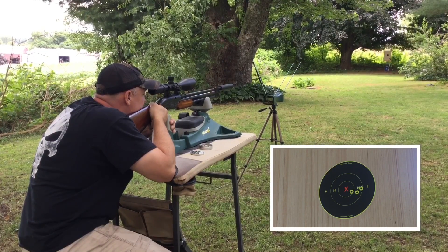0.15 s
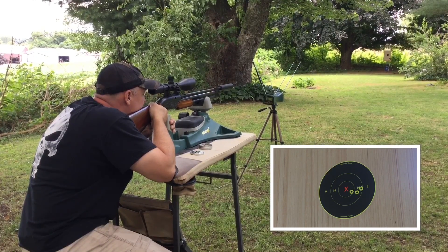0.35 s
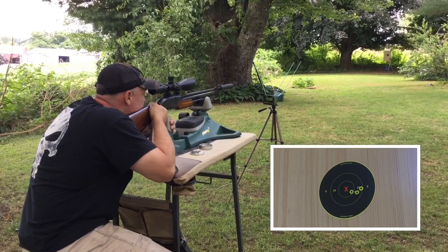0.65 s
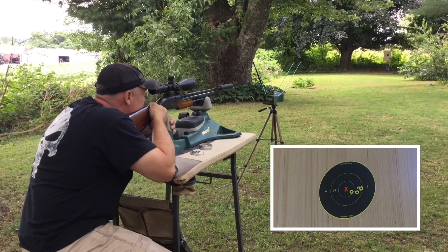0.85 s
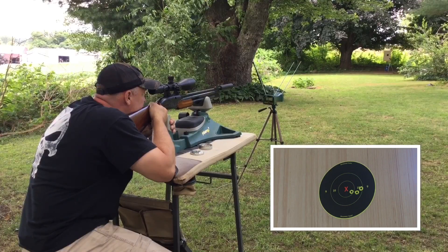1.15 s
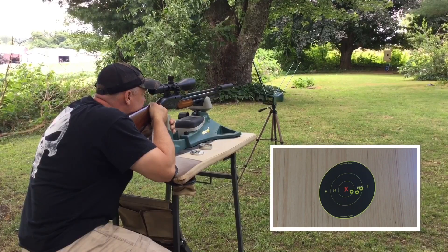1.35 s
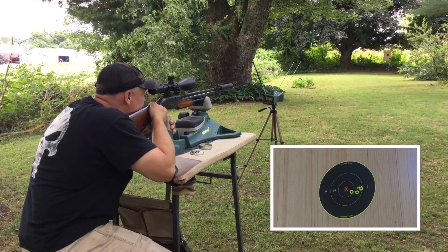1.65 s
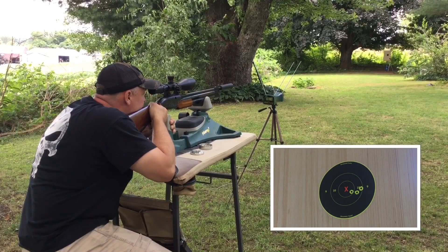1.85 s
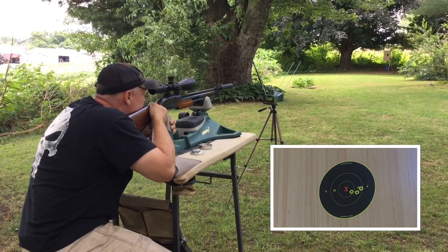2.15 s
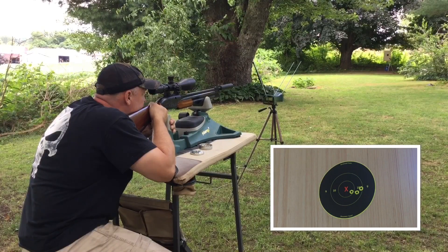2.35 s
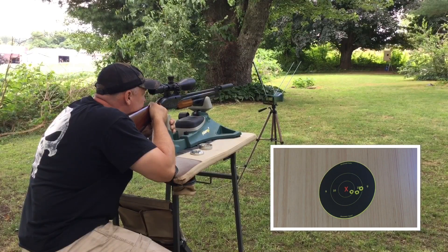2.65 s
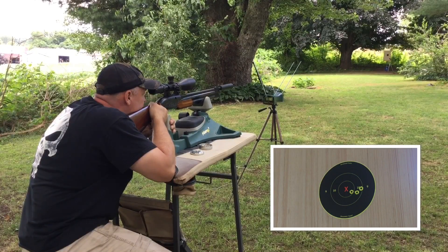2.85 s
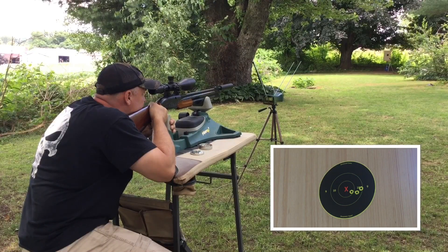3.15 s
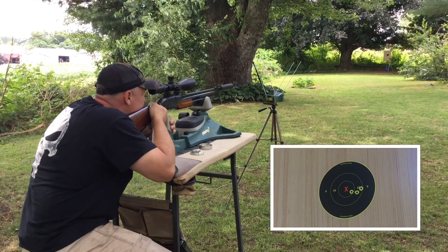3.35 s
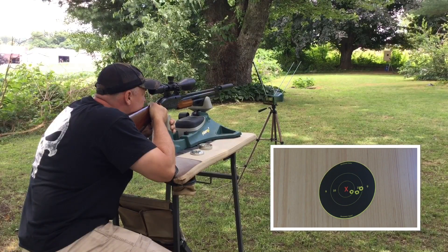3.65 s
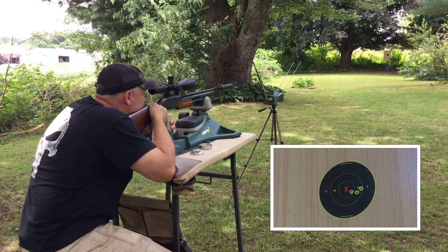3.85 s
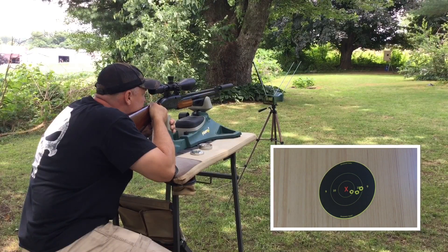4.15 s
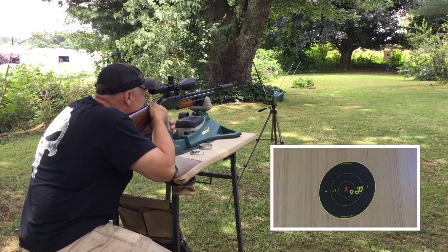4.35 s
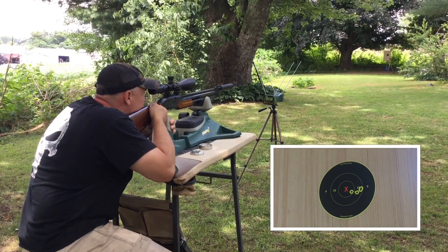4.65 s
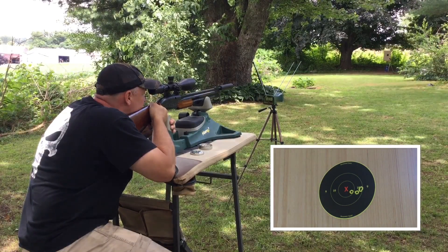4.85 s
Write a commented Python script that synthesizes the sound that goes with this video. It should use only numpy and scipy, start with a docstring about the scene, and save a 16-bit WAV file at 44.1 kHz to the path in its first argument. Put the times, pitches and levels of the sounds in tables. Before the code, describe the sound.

A single air rifle crack and pellet strike break the hush of a backyard where small birds chirp softly.

```python
"""In a quiet garden a breeze buffets the microphone and birds whistle over distant traffic.
At 4.5 s a spring-piston air rifle fires: the sear trips, then the piston slams home and excites the
modes of stock and action. 55 ms later the pellet strikes the target board, which rings and rattles.
Both bangs overload the microphone. Early echoes and a sharp, bright tick at 4.72 s follow,
and the sound dies away in the foliage."""
import sys
import numpy as np
from scipy import signal
from scipy.fft import rfft, irfft
from scipy.io import wavfile
from scipy.ndimage import uniform_filter1d

SR = 44100
rng = np.random.default_rng(int(sys.argv[2]) if len(sys.argv) > 2 else 0)


def to_wav(s):
    """Save 16-bit WAV."""
    ch = np.atleast_2d(s).T  # columns
    pcm = np.round(np.clip(ch, -1, 1) * 32767)  # PCM
    wavfile.write(sys.argv[1], SR, pcm.astype(np.int16))


N = 221247

# sear, piston, rebound: (time [s], level [dB], rise [s], hold [s], t60 [s], tilt [dB/octave])
BLOWS = [(4.5101, -13.5, 0.013, 0.0036, 0.033, -0.5), (4.516, -3, .003, 0.0055, 0.018, 1.2),
         (4.5247, -7, .004, 0.0038, 0.069, -0.2)]
# spectrum of a blow: (frequency [Hz], relative level [dB])
BLOW_SPECTRUM = [(45, -9), (190, 5), (330, 3.5), (520, 5.5), (800, 0.5), (1500, -0.5), (3000, -5.5),
                 (5000, -9.5), (8000, -9.5), (10500, -8.5), (12500, -4), (15500, -10.5)]
# modes of stock, spring and steel action: (frequency [Hz], level re blow [dB], t60 [s])
RIFLE_MODES = [(76, -10, 0.21), (151, -17.5, .1), (189.4, -12, 0.13), (328, -17.5, 0.098), (392, -18, 0.13),
               (527, -9, 0.063), (2436, -19.5, 0.11), (3300, -28, .12), (3360, -19, 0.11),
               (4430, -20, 0.18), (4560, -28, 0.16), (5300, -30, .16), (6360, -31, .14), (7630, -40, .25),
               (8800, -26, .14), (9400, -33, .13), (10400, -25, .12), (12600, -24, .11), (12800, -23, .14),
               (13800, -22, .16)]
def rifle(chatter_db=-18, chatter_t60=0.26):
    """Impact excitation: each blow rings stock and action; the slack mainspring chatters on."""
    action = sum(undb(db) * ring(start, RIFLE_MODES) for start, db, *_ in BLOWS)
    t = since(BLOWS[1][0])
    chatter = noise(BLOW_SPECTRUM, tilt_db=1) * (t > 0) * fade(t, chatter_t60)
    chatter *= undb(chatter_db + 2 * walk(400))
    recoil = thump(start=4.5235, db=-8, high_hz=225, low_hz=55, glide_s=0.021, swell_s=0.0081)
    return bursts(BLOWS, BLOW_SPECTRUM) + action + chatter + recoil


# pellet on paper, then board: (time [s], level [dB], rise [s], hold [s], t60 [s], tilt [dB/octave])
STRIKES = [(4.5692, -15, 0.02, 0.0046, 0.04, 3), (4.5709, -4, 0.0019, .0014, .014, -0.8)]
# spectrum of a strike: (frequency [Hz], relative level [dB])
STRIKE_SPECTRUM = [(100, -6.5), (350, 1), (550, -7), (800, -14), (1250, 5.5), (1900, -1.5), (2700, -5),
                   (3700, -6), (5000, -16), (9000, -17), (15000, -23)]
# modes of the board: (frequency [Hz], level [dB], t60 [s])
BOARD_MODES = [(1138, -12, .025), (1310, -11.5, 0.016), (1750, -26, 0.037), (2585, -16, 0.075),
               (3695, -14.5, 0.1)]
def target(rattle_db=-18, rattle_t60=0.21):
    """Damped free vibration: the struck board rings and rattles briefly."""
    hit = STRIKES[1][0]
    t = since(hit)
    rattle = undb(rattle_db) * noise(STRIKE_SPECTRUM, tilt_db=4.5) * (t > 0) * fade(t, rattle_t60)
    # a low thump, sinking in pitch, as the strike overloads the microphone
    overload = thump(start=4.5705, db=-.5, high_hz=156, low_hz=42.7, glide_s=0.011, swell_s=.0083)
    return bursts(STRIKES, STRIKE_SPECTRUM) + ring(hit, BOARD_MODES) + rattle + overload


# three early echoes, two parts of a tick, a soft swell:
# (time [s], level [dB], rise [s], hold [s], t60 [s], tilt [dB/octave])
AFTERSOUNDS = [(4.6052, -17, 0.0036, 0.0023, 0.08, 0), (4.6215, -32, 0.0093, .003, .05, 1),
               (4.6595, -23, .004, .001, .02, -1), (4.7195, -18, .008, 0.0018, 0.016, -3),
               (4.7215, -21, .001, .0006, .005, 3.0), (4.7160, -23, 0.14, 0.0092, .34, -.5)]
# their spectrum: (frequency [Hz], relative level [dB])
AFTERSOUND_SPECTRUM = [(80, -16.5), (300, -12), (500, -13.5), (800, -10.5), (1600, 5), (2800, -1),
                       (6000, -14), (14000, -19.5)]
def echoes_and_tick():
    """Delayed transients: early echoes of the bangs, then a sharp, bright tick at 4.72 s."""
    return bursts(AFTERSOUNDS, AFTERSOUND_SPECTRUM)


# bands of scattered sound: (frequency [Hz], relative level [dB], t60 [s])
FOLIAGE = [(60, -4, .5), (251, -8, 0.69), (500, -9.5, 0.83), (805, -11, 1.4), (1170, -5, 1.74),
           (2050, 0, 1.49), (3000, 1.5, 1.09), (4430, -5.5, 1.034), (8140, -5, 0.75), (14300, -11.5, 0.49)]
def foliage(start, level_db=-15.5, build_s=0.043, patchy_db=1.05):
    """Scattering: leaves and twigs spread the bangs into a wash whose middle bands last longest."""
    t, out = since(start), np.zeros(N)
    scatter = rfft(noise([row[:2] for row in FOLIAGE]) * undb(patchy_db * walk(120)))
    centres = np.log2([row[0] for row in FOLIAGE])
    for weights, (_, _, t60) in zip(np.eye(len(FOLIAGE)), FOLIAGE):
        band = irfft(scatter * np.interp(octaves(), centres, weights), N)
        out += band * fade(t, t60)
    return undb(level_db) * out * (1 - np.exp(-t / build_s))


# the songbird: (syllable, pitch [Hz], level [dB], start times [s])
SONG = [("slur", 5450, -79, [.945]), ("whistle", 5060, -69, [1.077, 1.337]),
        ("slur", 6300, -75, [1.195, 1.466]), ("swoop", 4600, -62.5, [1.585, 1.869]),
        ("slur", 5550, -73, [2.152, 2.373]), ("chuckle", 4320, -66, [2.208, 2.429]),
        ("slur", 6600, -71, [2.682]), ("zigzag", 5500, -69, [2.724]), ("zigzag", 4300, -68.5, [3.1]),
        ("flick", 3500, -70, [2.808, 3.136]), ("buzz", 7100, -72.5, [3.04]), ("peep", 4620, -69, [3.067]),
        ("slur", 4080, -69, [3.282]), ("flick", 6600, -71.5, [3.328, 3.575]), ("arch", 3120, -66, [3.402]),
        ("slur", 4560, -68.5, [3.503]), ("chip", 4920, -64.5, [3.791, 3.944]), ("chip", 4800, -69, [4.1]),
        ("peep", 5020, -66.5, [4.263]), ("dip", 3920, -72.5, [4.327])]
# larger birds further off: (syllable, pitch [Hz], level [dB], start times [s])
FAR_CALLS = [("hoot", 1465, -66, [.01]), ("buzz", 1750, -68.5, [.705]), ("buzz", 2700, -73, [.73])]
# notes of each syllable: (delay [s], length [s], first pitch [ratio], middle pitch [ratio],
# last pitch [ratio], relative level [dB], warble depth [share of pitch])
SYLLABLES = { "slur": [(0, 0.0517, 1.1, 1, .975, 0, 0.0073)],
             "whistle": [(0, .026, .89, .81, 0.78, -2, .01), (.035, 0.043, 1, 0.99, .99, 0, .002)],
             "swoop": [(0, .031, .975, 1, 1, 0.5, .008), (.052, .054, 1, .85, .76, -6.5, .02),
             (.116, .125, 1.13, 1.29, 1.44, -12, .01)], "chuckle": [(0, .035, 0.81, 0.99, .95, 0, 0.022),
             (.035, 0.0266, .84, .7, .64, -4, .01), (.082, .032, .61, .7, .78, -6, .01)],
             "zigzag": [(0, .016, .92, 1, 1.05, 0, .01), (.02, .02, 0.93, .89, .78, -1, .015)],
             "flick": [(0, .032, .9, 0.99, 1.08, 0, .02)], "buzz": [(0, .07, 0.83, 1, 1.05, 0, .07)],
             "hoot": [(0, .1, .98, 1, 1, 0, .003)], "arch": [(0, .046, .84, 0.99, .945, 0, .015)],
             "peep": [(0, .036, .95, 0.99, .99, 0, .015)], "chip": [(0, 0.033, .9, 1, 0.92, 1, .008),
             (.045, .042, 1.24, 1.1, .94, -2.5, .055)], "dip": [(0, .03, 1, .93, .86, -2, .02),
             (.05, .074, .87, 0.99, 1.08, 0, .015)], }
def birds(song, warble_hz=140, waver=0.0078, flutter_db=3):
    """Frequency modulation: each whistle glides through three pitches; deep warble makes it buzz."""
    out, unsteady = np.zeros(N), walk(500)
    for name, pitch_hz, db, starts in song:
        for start in starts:
            for delay, length, first, middle, last, note_db, warble in SYLLABLES[name]:
                progress = np.linspace(0, 1, int(length * SR))
                span = int((start + delay) * SR) + np.arange(len(progress))
                glide = np.polyval(np.polyfit([0, .5, 1], [first, middle, last], 2), progress)
                vibrato = warble * np.sin(2 * np.pi * warble_hz * length * progress)
                hz = pitch_hz * glide * (1 + vibrato + waver * unsteady[span])
                envelope = undb(db + note_db) * np.sin(np.pi * progress)
                out[span] += envelope * np.sin(2 * np.pi * np.cumsum(hz) / SR)
    return out * undb(flutter_db * walk(150))


def canopy(x, direct_db=-2, wet_db=-4.5, t60=.36):
    """Reverberation: branches around a singer weaken each note and add a short diffuse tail."""
    response = rng.standard_normal(N) * fade(since(0), t60)
    tail = signal.fftconvolve(x, response / np.linalg.norm(response))[:N]
    return undb(direct_db) * x + undb(wet_db) * tail


# stir of the breeze: (time [s], level [dB])
BREEZE = [(0, -57), (.35, -55), (1.0, -56.5), (1.75, -53), (1.95, -62), (2.4, -56), (3.25, -54),
          (5.0, -55.5)]
# spectrum of the buffeting: (frequency [Hz], relative level [dB])
BUFFET_SPECTRUM = [(18, -30), (35, -8), (60, 1), (90, -2.5), (125, -0.5), (165, -6), (230, -10.5),
                   (300, -25), (400, -22), (800, -67.5), (3000, -110)]
# strongest puffs: (time [s], level [dB], swell [s])
PUFFS = [(.13, -45, .029), (.424, -30, .012), (.506, -36.5, .021), (.69, -42, .022), (1.168, -42, 0.025),
         (1.261, -40.5, 0.017), (1.318, -36, 0.0092), (2.572, -38.5, 0.0084), (3.452, -38, 0.0079)]
def wind(flutter_db=2.8, eddy_db=-12, puff_hz=122, sag=0.55):
    """Turbulence: each puff rocks the air at the microphone port, slows as it passes and sheds eddies."""
    breeze = noise(BUFFET_SPECTRUM) * undb(curve(BREEZE) + flutter_db * walk(30))
    puffs = sum(thump(start, db, puff_hz, sag * puff_hz, 2 * swell, swell) for start, db, swell in PUFFS)
    puff_envelope = np.abs(signal.hilbert(puffs))
    eddies = undb(eddy_db) * puff_envelope * noise(BUFFET_SPECTRUM, tilt_db=2.5)
    return breeze + puffs + eddies


# swells of traffic: (time [s], relative level [dB])
TRAFFIC = [(0, -76.5), (1.6, -75), (1.88, -66), (2.25, -72), (2.52, -67), (3.0, -71.5), (3.35, -66.5),
           (4.4, -76.5)]
# spectrum of the road: (frequency [Hz], relative level [dB])
ROAD_SPECTRUM = [(180, -26), (300, -7.5), (388, 0), (455, -5), (878, -7.5), (1030, -7.5), (1480, -16),
                 (2500, -26), (3250, -62), (5500, -120)]
def traffic(gain_db=-1.0, waver_db=0.66):
    """Amplitude modulation: the noise of a distant road slowly swells and ebbs."""
    return noise(ROAD_SPECTRUM) * undb(curve(TRAFFIC) + gain_db + waver_db * walk(7.8))


# spectrum of the quiet garden: (frequency [Hz], relative level [dB])
AIR_SPECTRUM = [(35, -31), (60, -7), (132, -2.5), (215, -10.5), (300, -18.5), (395, -13.5), (495, -30.5),
                (570, -24.5), (950, -33), (1200, -27.5), (1650, -33), (6000, -40.5), (7600, -45.5),
                (9200, -43), (15300, -52)]
def still_air(level_db=-58):
    """Stationary noise: a low, steady hush forms the ambient floor."""
    return undb(level_db) * noise(AIR_SPECTRUM)


def bursts(rows, spectrum):
    """Broadband transients: each is noise that rises exponentially, holds briefly and decays."""
    t, out = since(0), np.zeros(N)
    for start, db, rise, hold, t60, tilt in rows:
        envelope = fade(np.maximum(start - t, 0), rise) * fade(since(start + hold), t60)
        out += undb(db) * noise(spectrum, tilt) * envelope
    return out


def ring(start, modes, detune=0.0019):
    """Modal superposition: one blow starts damped sinusoids, each a little off its pitch."""
    t, out = since(start), np.zeros(N)
    for hz, db, t60 in modes:
        detuned_hz = hz * (1 + detune * rng.standard_normal())
        out += undb(db) * np.sin(2 * np.pi * detuned_hz * t) * fade(t, t60)
    return out


def thump(start, db, high_hz, low_hz, glide_s, swell_s):
    """Heavy damping: an oscillation swells and dies in a few swings as its pitch sinks."""
    t = since(start)
    hz = low_hz + (high_hz - low_hz) * np.exp(-t / glide_s)
    swing = -np.sin(2 * np.pi * np.cumsum(hz * (t > 0)) / SR)
    return undb(db) * swing * (t / swell_s) ** 2 * np.exp(2 - 2 * t / swell_s)


def noise(spectrum, tilt_db=0):
    """Spectral shaping: noise of rms 1, tilted per octave, with nothing below the first frequency."""
    hz, db = np.transpose(spectrum)
    gain_db = np.interp(octaves(), np.log2(hz), db, left=-np.inf) + tilt_db * octaves()
    return unit(irfft(rfft(rng.standard_normal(N)) * undb(gain_db), N))


def walk(rate_hz):
    """Random modulation: smoothed steps of rms 1."""
    width = int(SR / rate_hz)
    steps = np.repeat(rng.standard_normal(N // width + 1), width)
    return unit(uniform_filter1d(uniform_filter1d(steps, width), width)[:N])


def fade(t, t60):
    """Exponential decay by 60 dB in t60 seconds."""
    return np.exp(-np.log(1000) * t / t60)


def curve(rows):
    """Linear interpolation of (time [s], value) rows."""
    return np.interp(since(0), *np.transpose(rows))


def since(start):
    """Elapsed time in seconds, zero before the start."""
    return np.maximum(np.arange(N) / SR - start, 0)


def octaves():
    """Logarithmic frequency: each spectral bin in octaves above 1 Hz."""
    return np.log2(np.maximum(np.fft.rfftfreq(N, 1 / SR), 1))


def undb(db):
    """Decibels to amplitude ratio."""
    return 10 ** (np.asarray(db) / 20)


def unit(x):
    """Normalisation to rms 1."""
    return x / np.sqrt(np.mean(x ** 2))


def scene():
    """Superposition: shot, strike, echoes and tick add to the birdsong and the garden."""
    shot = rifle() + target() + echoes_and_tick() + foliage(start=BLOWS[1][0])
    song = canopy(birds(SONG + FAR_CALLS))
    return (shot + song + wind() + traffic() + still_air())[None]


def record(dry, ceiling=0.94, knee=6, low_cut_hz=14, top_hz=15400):
    """Saturation: the microphone drops the deepest rumble and overloads on the bangs; the top is cut."""
    pressure = signal.sosfilt(signal.butter(1, low_cut_hz, "high", fs=SR, output="sos"), dry)
    saturated = pressure / (1 + np.abs(pressure / ceiling) ** knee) ** (1 / knee)
    return signal.sosfilt(signal.ellip(12, .2, 80, top_hz, fs=SR, output="sos"), saturated)


dry = scene()
out = record(dry)
to_wav(out)
```